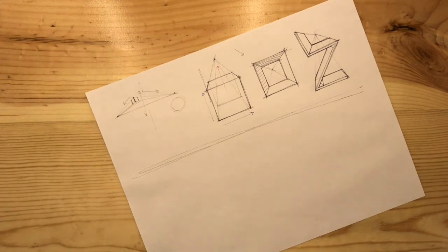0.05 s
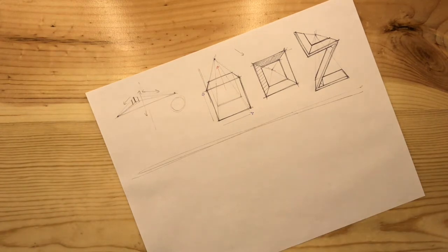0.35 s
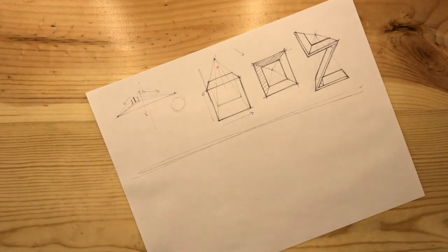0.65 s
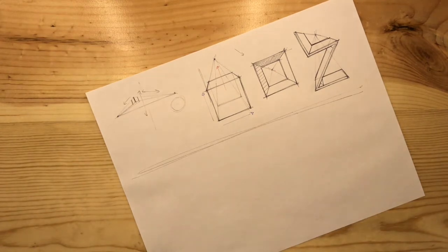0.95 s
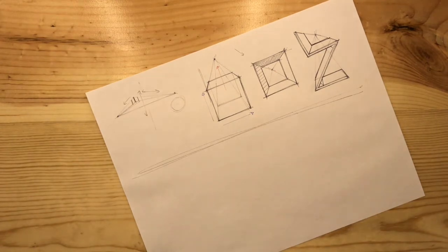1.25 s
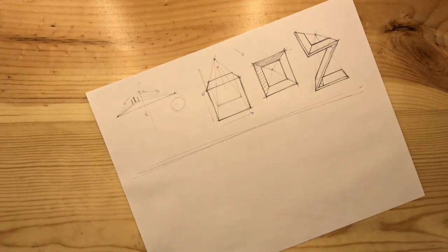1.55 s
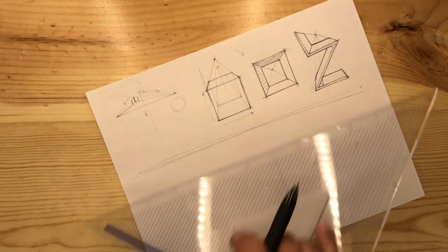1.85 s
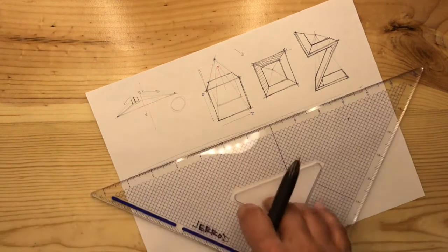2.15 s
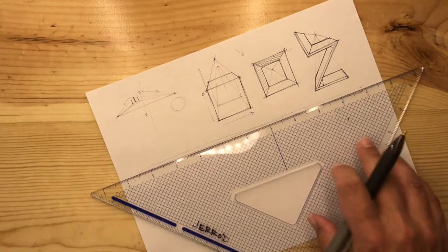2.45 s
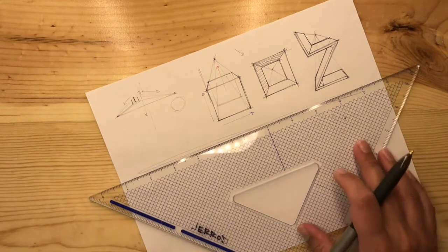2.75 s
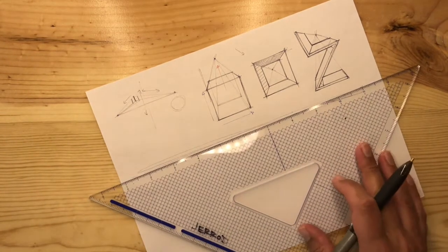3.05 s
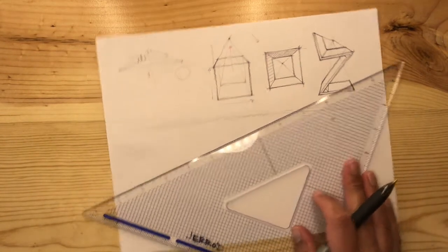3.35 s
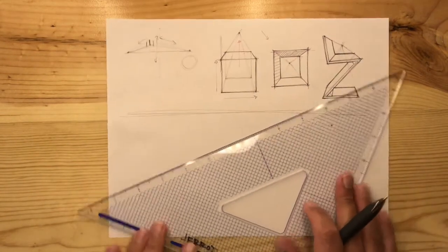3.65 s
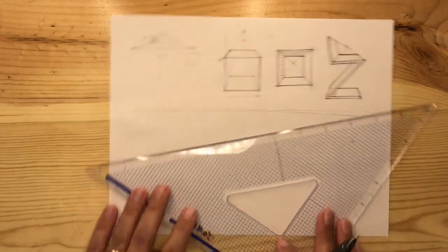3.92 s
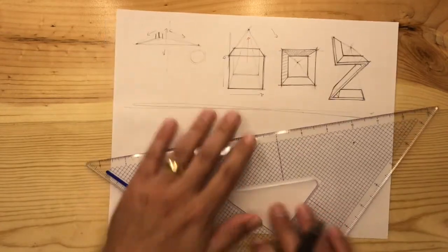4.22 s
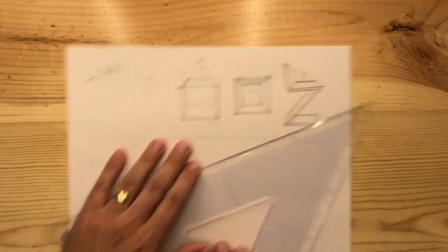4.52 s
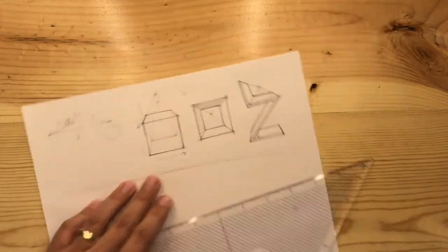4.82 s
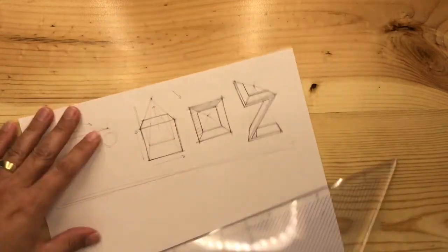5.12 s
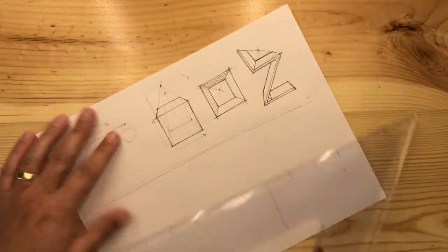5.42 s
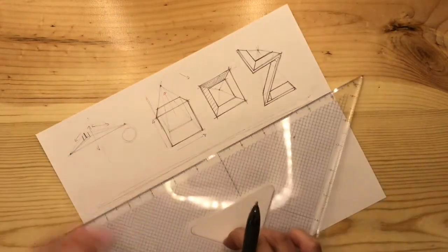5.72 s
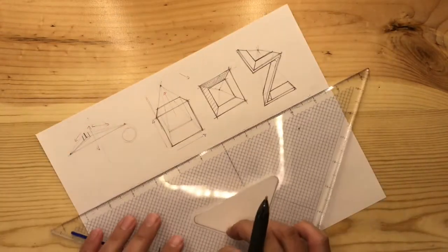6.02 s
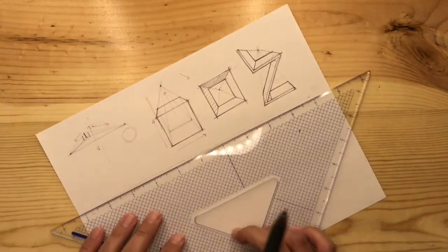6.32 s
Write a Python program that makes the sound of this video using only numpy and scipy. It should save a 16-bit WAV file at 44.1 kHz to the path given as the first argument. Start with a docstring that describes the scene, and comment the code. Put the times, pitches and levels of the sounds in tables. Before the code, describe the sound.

Heard up close in a small, slightly echoing room with a faint motor hum, a plastic triangle flexes with a short wobble and lands on a sheet of paper with a quick, loud rattle. Two soft thumps on the wooden desk follow. Paper and plastic then slide around in quiet, hissing strokes with a few small squeaks, until the triangle is put down again with two separate clacks.

```python
"""A wooden desk in a small, fairly live room with a faint motor hum, heard from one close microphone.
A plastic drafting triangle wobbles as it is picked up, clatters onto a sheet of paper and is pressed flat.
Hands slide and turn paper and triangle: the paper hisses, the plastic edge rasps and squeaks,
and the desk groans. Then the triangle is set down again with two clacks. Each hit rings the plastic,
thumps the desk and crunches the paper."""
import sys
import numpy as np
from scipy import signal
from scipy.fft import rfft, irfft, next_fast_len
from scipy.io import wavfile

SR = 44100
rng = np.random.default_rng(int(sys.argv[2]) if len(sys.argv) > 2 else 0)


def master(y):
    """Save y as 16-bit WAV."""
    cut = np.clip(np.atleast_2d(y).T, -1, 1)
    pcm = np.round(cut * 32767)  # scale
    wavfile.write(sys.argv[1], SR, pcm.astype(np.int16))


N = 285442
TIME = np.arange(N) / SR

# the triangle drops, rattles and falls flat; later it is set down edge by edge:
# start_s, strength_db, low_cut_hz, sharpness_hz, crunch_db, free_ring_db
EDGE_CLACKS = [ (2.011, 10.5, 257, 3040, -13, -17), (2.0290, -2, 500, 3215, -15, -6),
               (2.0420, -7, 710, 3200, -23, -8), (2.07, -5, 1200, 4400, -34, -9),
               (2.0871, 14.5, 1118, 4700, -11.5, -10), (5.6382, -14, 2240, 3460, -20.5, -15),
               (5.6807, 1, 253, 2300, -11, 7.5), (6.1341, 7, 795, 2700, -24, 5.5)]
# soft bumps of the hand on the triangle: start_s, strength_db, sharpness_hz, thud_db, crunch_db
HAND_BUMPS = [ (1.500, -15, 800, 3, -42), (1.521, -12.5, 680, 1, -36), (2.4264, 3, 980, -2, -8.5),
              (2.6924, 2.5, 740, 21.5, -26), (3.581, -15.5, 647, -23, -41)]
# light ticks against the paper: start_s, strength_db
PAPER_TICKS = [(0.8265, -24.5), (2.0082, -12.5), (2.36, -31), (2.886, -42), (4.083, -42.5), (4.6524, -26),
               (5.0315, -38), (5.064, -45)]
# tones that stand out of the triangle's dense ring:
# pitch_hz, width_hz, gain_db, free_share (1 = rings freely while an edge is held up)
TRIANGLE_RING_MODES = [(285, 84, 1.5, 0), (546, 11, 0, 0.72), (781, 12, 0, 0), (957, 38, -2.5, 1),
                       (1075, 8.3, 2.5, 0.6), (1163, 12, 2, 1), (1396, 6.9, -6, 0.053),
                       (895, 22, -2.5, 0.42), (2026, 18, -6.5, 0.1), (2360, 22, -9, 0),
                       (2500, 20, -4, 0.13), (2737, 220, -4.5, 0.6), (3050, 22, -1.5, 0.017),
                       (3310, 27, 0.5, 0.036)]
# the thud of the desk top: pitch_hz, width_hz, gain_db
DESK_THUD_MODES = [(140.3, 12, 0), (229.1, 10, -6.5), (317.5, 14, -11)]
# the triangle wobbles as it is lifted and swung: start_s, strength_db
WOBBLES = [(1.4286, 1), (1.96, -14.5), (1.9939, -8)]
# its bending tones: pitch_hz, width_hz, gain_db
WOBBLE_MODES = [(266, 19, 17.5), (438, 36, 9), (477, 47, 4.5), (693, 18, 4), (850, 45, -3.5)]

# hands push paper and triangle about: peak_s, rise_s, fall_s, friction_db, edge_bite_db (added for the rasp)
HAND_STROKES = [ (0.08, 0.28, 0.13, -75.5, 7), (0.781, 0.4, 0.48, -72, 6), (0.953, 0.049, .12, -61.5, 10.5),
                (1.471, 0.15, .14, -61, 5.5), (1.78, 0.26, 0.13, -70.5, 6.5),
                (1.899, 0.13, 0.44, -63.5, 3.5), (2.92, 0.75, 0.24, -73.5, 13),
                (3.27, 0.24, .24, -61.5, -6), (3.619, 0.058, .13, -67.5, 1), (3.82, 0.099, 0.18, -65, 3),
                (3.92, 0.075, 0.059, -61, -10), (4.25, 0.21, 0.13, -73, 6.5), (4.46, 0.22, 0.19, -52, -5.5),
                (4.67, 0.087, 0.065, -56.5, 5.5), (4.785, 0.069, 0.065, -59, 4), (4.94, 0.14, 0.11, -65, 2),
                (5.13, 0.14, 0.16, -61, -2), (5.30, 0.15, 0.083, -61, -9)]
# a palm bears down and judders over the desk: peak_s, rise_s, fall_s, strength_db
PALM_JUDDERS = [(4.53, 0.11, 0.11, -59), (4.675, 0.061, 0.072, -47)]
# the desk's groan under dragging: pitch_hz, width_hz, gain_db
DESK_GROAN_MODES = [(347.2, 91, -3), (538, 38, -3), (604, 70, 0.5), (726, 430, -10), (1030, 130, -9)]
# the rasp of the dragged plastic edge: pitch_hz, width_hz, gain_db
EDGE_RASP_MODES = [(1340, 660, -0.5), (2150, 710, -1), (3057, 1400, -3), (4585, 1200, -9.5),
                   (5836, 1100, -5)]
# the colour of sliding paper: frequency_hz, density_db
PAPER_COLOUR = [(200, -34), (900, -11.5), (2500, -4.5), (4000, 0), (6300, -2.5), (8500, -3), (10500, -3),
                (12500, 2.5), (16000, 1)]
# the plastic edge sticks and slips: peak_s, level_db, half_length_s
EDGE_SQUEAKS = [(3.827, -68, 0.086), (5.11, -55, 0.015), (5.113, -60.5, .04), (5.217, -68, .009),
                (5.295, -57.5, 0.011)]
# the tones of a squeak: pitch_hz, width_hz, gain_db
EDGE_SQUEAK_MODES = [(1680, 80, 0), (2830, 110, 3), (3400, 150, -4), (4360, 300, -11), (5900, 600, -16)]

# the room's reverb time: frequency_hz, t60_s
REVERB_DECAY = [(100, 0.79), (300, 0.3), (1000, .5), (2500, 0.5), (5000, 0.47), (13000, 0.14)]
# the reverb against the direct sound: frequency_hz, gain_db
REVERB_COLOUR = [(80, -2.5), (300, -3), (1000, -3), (2500, -6.5), (6000, -8.5), (13000, -8.5)]
# the low rumble of room and desk: frequency_hz, density_db
LOW_RUMBLE_COLOUR = [(10, -38), (25, -14), (45, -4.5), (70, 7), (85, -7), (110, -11.5), (200, -27),
                     (800, -75)]
# the rumble swells now and then: peak_s, half_length_s, level_db
RUMBLE_SWELLS = [(0.58, 0.34, -60), (1.778, 0.19, -56.5), (2.122, 0.12, -49.5), (3.02, 0.3, -59),
                 (4.288, 0.23, -61), (5.468, 0.15, -59), (6.168, .08, -54)]
# the motor's hum: pitch_hz, level_db
MOTOR_TONES = [(59.2, -75), (118.4, -74)]
# room tone ahead of its low cut: frequency_hz, density_db
ROOM_TONE_COLOUR = [(15, -74.5), (25, -16.5), (37, -10), (59, -1), (92, -28.5), (127, -11.5), (166, -18),
                    (641, -32.5), (754, -27), (3720, -36), (16000, -43)]


def triangle_hits():
    """Hard clacks of the edge, soft bumps of the hand and light ticks on the paper."""
    track = np.zeros((2, N))
    for start_s, db, low_cut_hz, sharpness_hz, crunch_db, free_ring_db in EDGE_CLACKS:
        clack = hit(db, low_cut_hz, sharpness_hz, thud_db=db + 5.5, crunch_db=crunch_db,
                    crunch_t60_s=0.049, free_ring_db=free_ring_db)
        add(track, start_s, clack)
    # the pad of the hand moves the whole plate and flattens the paper slowly
    for start_s, db, sharpness_hz, thud_db, crunch_db in HAND_BUMPS:
        bump = hit(db, low_cut_hz=337, sharpness_hz=sharpness_hz, thud_db=thud_db, crunch_db=crunch_db,
                   crunch_t60_s=0.36, chatter_t60_s=0.16, rolloff_order=2)
        add(track, start_s, bump)
    for start_s, db in PAPER_TICKS:
        tick = hit(db + 4.5, low_cut_hz=803, sharpness_hz=3430, thud_db=db, crunch_db=db,
                   crunch_t60_s=0.032)
        add(track, start_s, tick)
    return track


def hit(ring_db, low_cut_hz, sharpness_hz, thud_db, crunch_db, crunch_t60_s,
        free_ring_db=-5.0, snap_db=-8.5, chatter_t60_s=0.035, rolloff_order=3, size=16000):
    """One blow rings the plastic, thumps the desk and crushes the paper; rows: direct, reverb send."""
    click = signal.unit_impulse(size)
    # the flat plate buzzes against the desk for a moment after the blow
    buzz = from_db(snap_db) * click + burst(rng.standard_normal(size), chatter_t60_s)
    # the room gathers all directions at once, which evens the buzz out into one clean click
    force = butter(np.array([buzz, click]), sharpness_hz, "low", order=rolloff_order)
    force = butter(force, low_cut_hz, "high", order=1)
    ring = triangle_ring(force, free_ring_db)
    thud = resonate(butter(click, 720, "low"), DESK_THUD_MODES)
    fibres = burst(grains(size, per_s=7000, spread_db=-1.0), crunch_t60_s)
    crunch = butter(fibres, [1200, 13000], "band", order=1)
    return from_db(ring_db) * ring + from_db(thud_db) * thud + from_db(crunch_db) * crunch


def triangle_ring(force, free_ring_db):
    """The plastic's dense, damped modes pass the blow on evenly; a few tones stand out above them."""
    ring = force
    for hz, width_hz, db, free_share in TRIANGLE_RING_MODES:
        ring = ring + resonate(ring, [(hz, width_hz, db + free_share * free_ring_db)])
    return butter(ring, 7500, "low", order=6)


def triangle_wobbles():
    """A soft push bends the lifted plate, which springs back."""
    pushes = np.zeros(N)
    for start_s, db in WOBBLES:
        add(pushes, start_s, from_db([db]))
    return resonate(butter(pushes, 1100, "low"), WOBBLE_MODES)


def slides(groan_trim_db=-3.0, rasp_trim_db=-4.5, hiss_trim_db=-1.0):
    """Friction grains groan in the desk, rasp on the plastic edge and hiss in the paper."""
    hiss_level = rasp_level = 0
    for peak_s, rise_s, fall_s, friction_db, edge_bite_db in HAND_STROKES:
        friction = from_db(friction_db) * swell(peak_s, rise_s, fall_s)
        hiss_level = np.hypot(hiss_level, friction)
        rasp_level = np.hypot(rasp_level, from_db(edge_bite_db) * friction)
    groan_level = from_db(-6) * rasp_level   # the harder the edge bites, the more the desk groans
    for peak_s, rise_s, fall_s, db in PALM_JUDDERS:
        groan_level = np.hypot(groan_level, from_db(db) * swell(peak_s, rise_s, fall_s))
    groan = rms_one(resonate(grains(N, per_s=2200, spread_db=1.0), DESK_GROAN_MODES))
    rasp = rms_one(resonate(grains(N, per_s=4000, spread_db=-1.5), EDGE_RASP_MODES))
    hiss = coloured(grains(N, per_s=4500, spread_db=-0.5), PAPER_COLOUR)
    return (from_db(groan_trim_db) * groan_level * groan
            + from_db(rasp_trim_db) * rasp_level * rasp
            + from_db(hiss_trim_db) * hiss_level * hiss)


def edge_squeaks():
    """Quick slips swell and fade, ringing a few sharp resonances of the edge."""
    level = sum(from_db(db) * np.exp(-np.minimum(((TIME - peak_s) / half_s) ** 2, 20))
                for peak_s, db, half_s in EDGE_SQUEAKS)
    slips = grains(N, per_s=3400, spread_db=1.0)
    return level * rms_one(resonate(slips, EDGE_SQUEAK_MODES))


def room_reverb(send, build_s=0.0058, size=35000):
    """Diffuse echoes build up within milliseconds; the top end dies first."""
    fade_in = 1 - np.exp(-(TIME[:size] / build_s) ** 2)
    band_edges_hz = np.geomspace(60, 17000, 17)
    tail = 0
    for low, high in zip(band_edges_hz, band_edges_hz[1:]):
        centre_hz = np.sqrt(low * high)
        echoes = butter(rng.standard_normal(size), [low, high], "band") * fade_in
        gain = from_db(at_hz(REVERB_COLOUR, centre_hz)) * np.sqrt(2 * (high - low) / SR)
        tail = tail + gain * burst(echoes, at_hz(REVERB_DECAY, centre_hz))
    return signal.fftconvolve(send, tail)[:N]


def low_rumble(bed_db=-68.5, waver_db=6, wavers_per_s=6.9):
    """The low end of room and desk wavers at random and swells now and then."""
    waver = np.interp(TIME * wavers_per_s, np.arange(200), rng.uniform(-1, 1, 200))
    level = from_db(bed_db + waver_db * waver)
    for peak_s, half_s, db in RUMBLE_SWELLS:
        level = np.hypot(level, from_db(db) * swell(peak_s, half_s, half_s))
    return level * coloured(rng.standard_normal(N), LOW_RUMBLE_COLOUR)


def motor_hum():
    """A motor hums faintly on a low tone and its octave."""
    return sum(np.sqrt(2) * from_db(db) * np.sin(2 * np.pi * (hz * TIME + rng.random()))
               for hz, db in MOTOR_TONES)


def room_tone(level_db=-71.5):
    """The steady air of the quiet room; its level is set on the part above 200 Hz."""
    air = butter(coloured(rng.standard_normal(N), ROOM_TONE_COLOUR), 132.7, "high", order=1)
    return from_db(level_db) * air / np.std(butter(air, 200, "high", order=4))


def grains(size, per_s, spread_db):
    """Paper fibres catch and let go: dense clicks of uneven size; rms 1."""
    strengths = from_db(spread_db * np.minimum(rng.exponential(1, size), 4))
    return rms_one(strengths * rng.standard_normal(size) * (rng.random(size) < per_s / SR))


def swell(peak_s, rise_s, fall_s, speed_power=1.36):
    """The envelope of one move: speed rises and sinks to rest, and the noise grows as a power of it."""
    speed = np.sin(np.pi / 2 * np.interp(TIME, [peak_s - rise_s, peak_s, peak_s + fall_s], [0, 1, 0]))
    return speed ** speed_power


def burst(noise, t60_s):
    """Noise that dies away; unit energy."""
    fading = noise * from_db(-60 * TIME[:len(noise)] / t60_s)
    return fading / np.sqrt(np.sum(fading ** 2))


def resonate(x, modes):
    """Parallel resonators of alternating polarity."""
    out = 0
    for k, (hz, width_hz, db) in enumerate(modes):
        radius = np.exp(-np.pi * width_hz / SR)
        poles = [1, -2 * radius * np.cos(2 * np.pi * hz / SR), radius ** 2]
        gain = (-1) ** k * from_db(db) * (1 - radius ** 2) / 2
        out = out + gain * signal.lfilter([1, 0, -1], poles, x + 1e-18)
    return out


def coloured(noise, colour):
    """Steady noise through an EQ curve; rms 1."""
    size = next_fast_len(len(noise))
    gains = from_db(at_hz(colour, np.fft.rfftfreq(size, 1 / SR)))
    return rms_one(irfft(rfft(noise, size) * gains, size)[:len(noise)])


def at_hz(curve, hz):
    """Read a curve on a log-frequency axis."""
    points_hz, values = np.transpose(curve)
    return np.interp(np.log(np.maximum(hz, 1)), np.log(points_hz), values)


def butter(x, hz, kind, order=2):
    return signal.sosfilt(signal.butter(order, hz, kind, fs=SR, output="sos"), x + 1e-18)


def add(track, start_s, sound):
    at = round(start_s * SR)
    track[..., at:at + sound.shape[-1]] += sound[..., :N - at]


def from_db(db):
    return 10 ** (np.asarray(db) / 20)


def rms_one(x):
    return x / np.sqrt(np.mean(x ** 2) + 1e-20)


def scene():
    """One microphone feeds both channels, each with a trace of hiss of its own."""
    direct, send = triangle_hits() + triangle_wobbles() + slides() + edge_squeaks()
    channel_hiss = from_db(-101) * butter(rng.standard_normal((2, N)), 6000, "high")
    return direct + room_reverb(send) + low_rumble() + motor_hum() + room_tone() + channel_hiss


def record(dry):
    """A steep high cut at 16 kHz."""
    return signal.sosfilt(signal.ellip(10, .1, 70, 16000, fs=SR, output="sos"), dry)


dry = scene()
out = record(dry)
master(out)
```